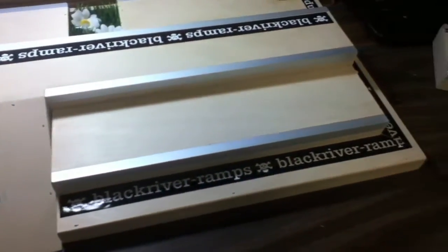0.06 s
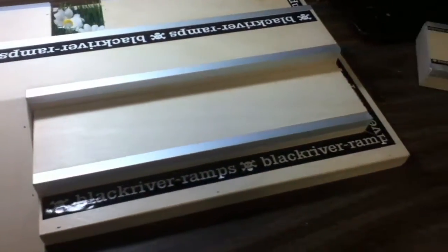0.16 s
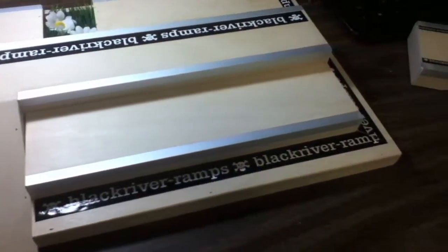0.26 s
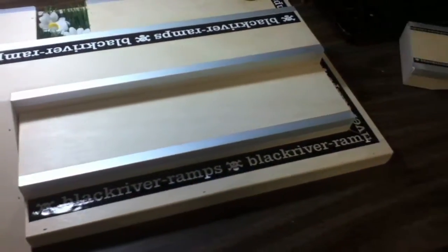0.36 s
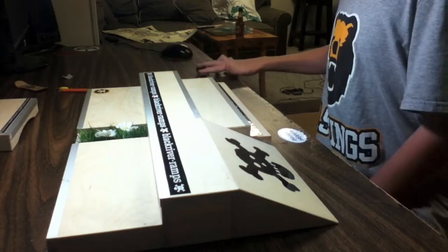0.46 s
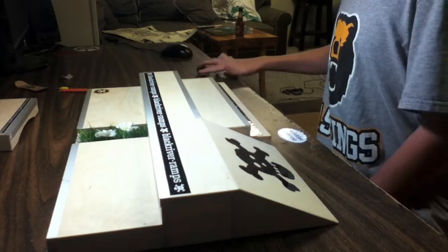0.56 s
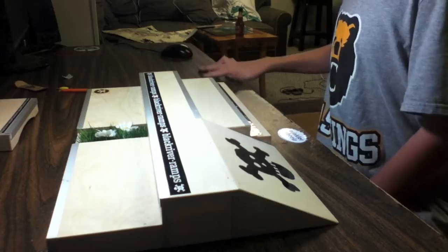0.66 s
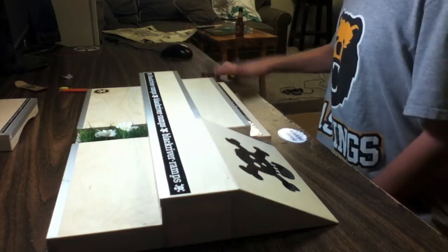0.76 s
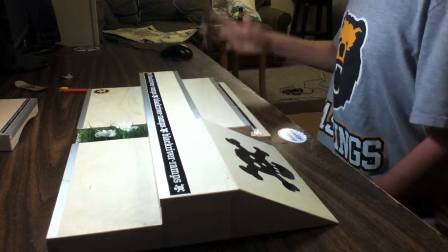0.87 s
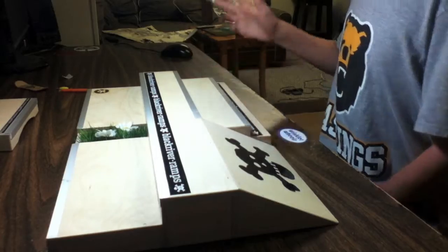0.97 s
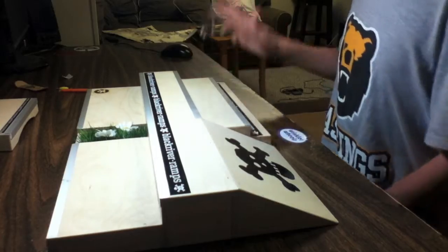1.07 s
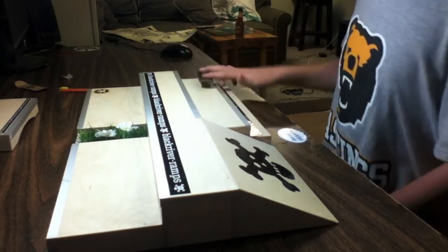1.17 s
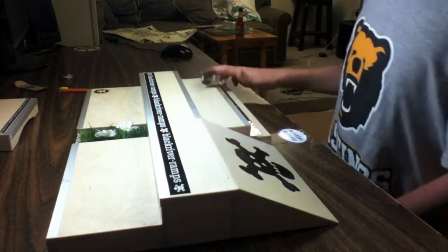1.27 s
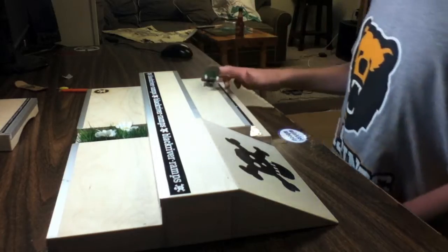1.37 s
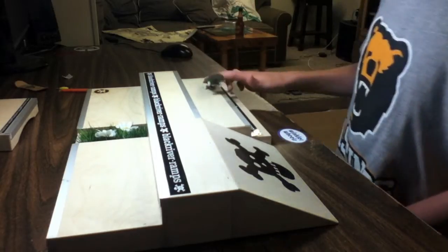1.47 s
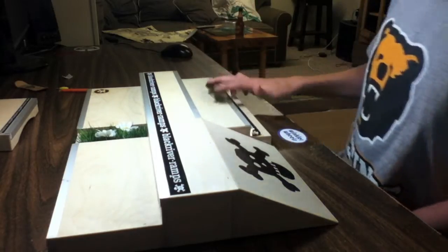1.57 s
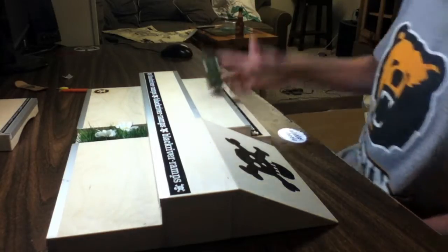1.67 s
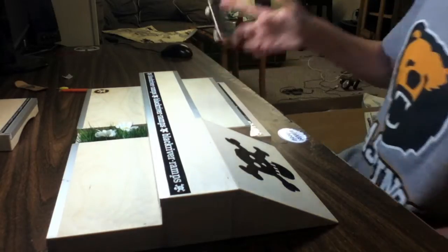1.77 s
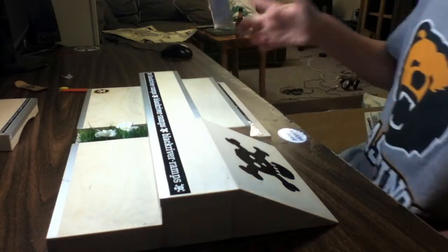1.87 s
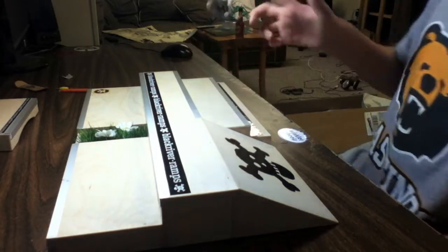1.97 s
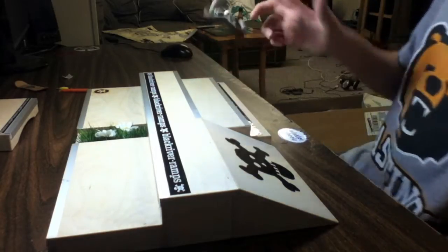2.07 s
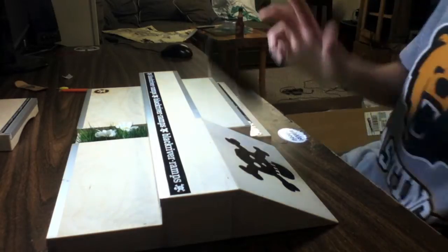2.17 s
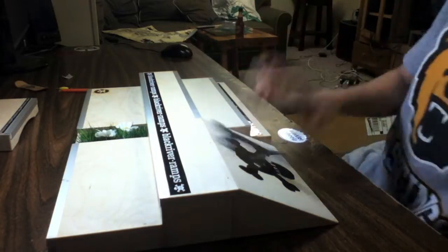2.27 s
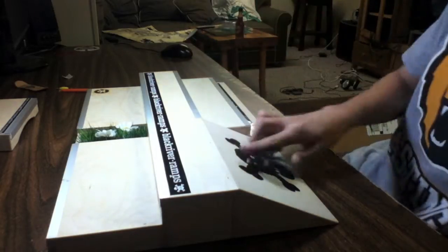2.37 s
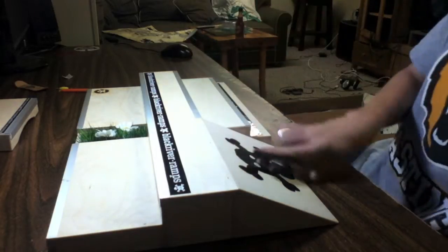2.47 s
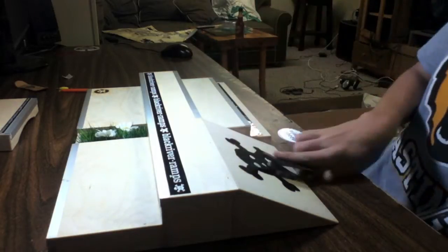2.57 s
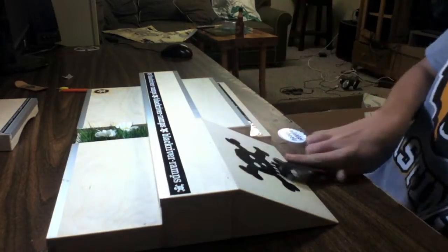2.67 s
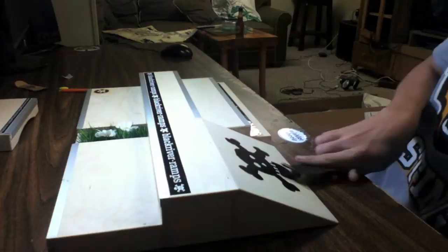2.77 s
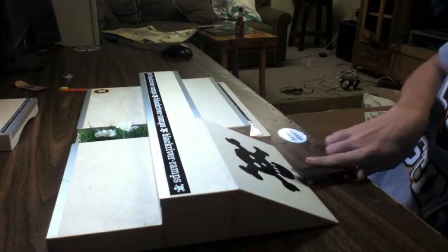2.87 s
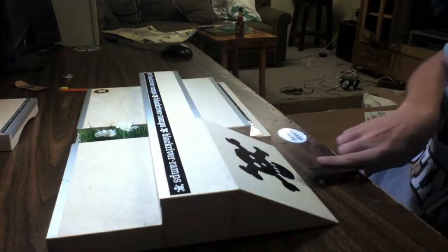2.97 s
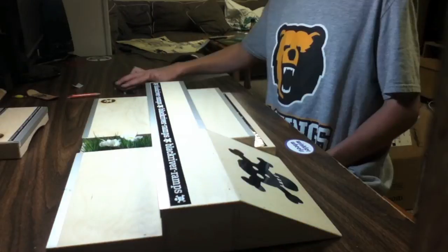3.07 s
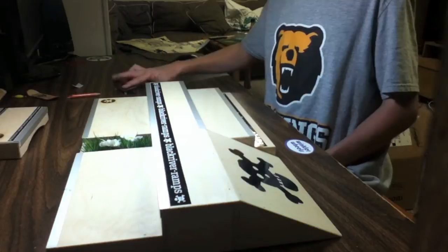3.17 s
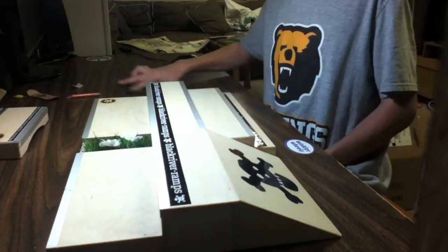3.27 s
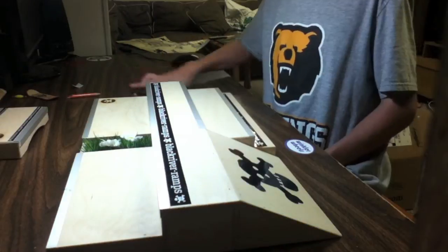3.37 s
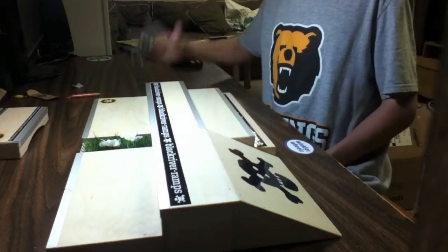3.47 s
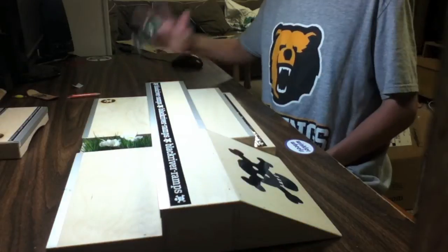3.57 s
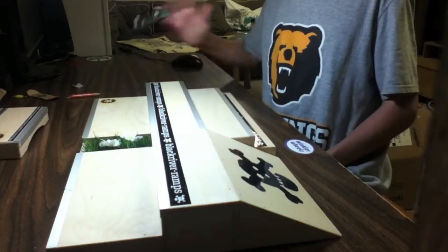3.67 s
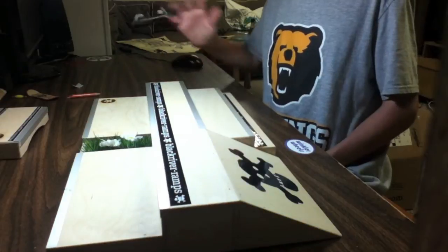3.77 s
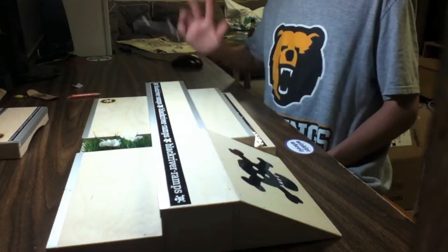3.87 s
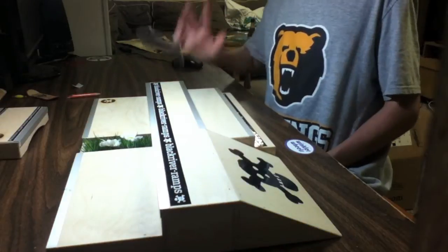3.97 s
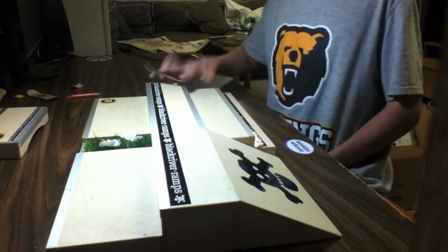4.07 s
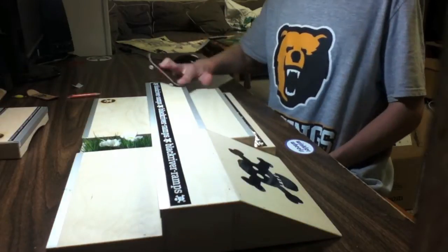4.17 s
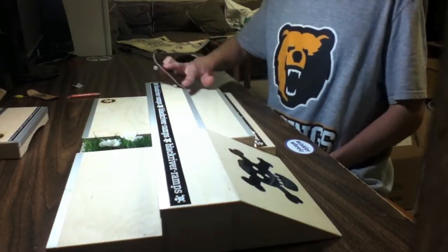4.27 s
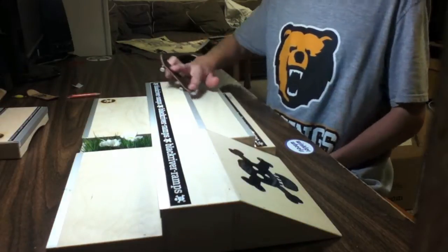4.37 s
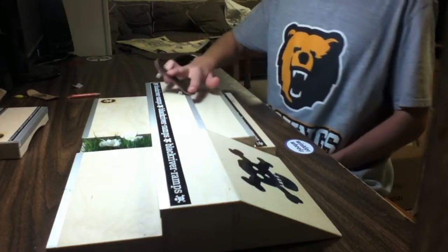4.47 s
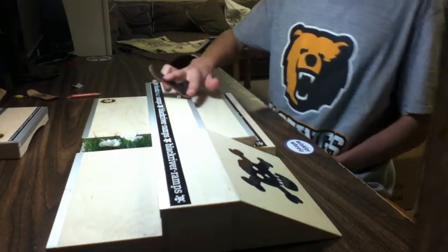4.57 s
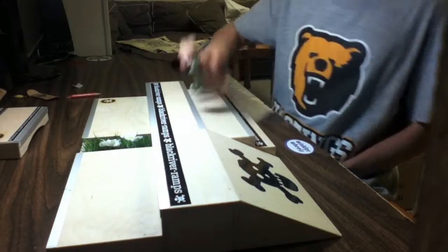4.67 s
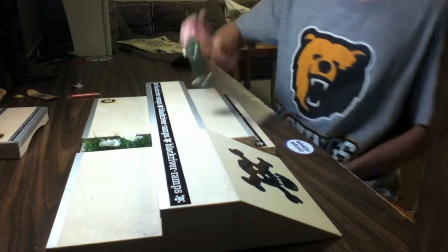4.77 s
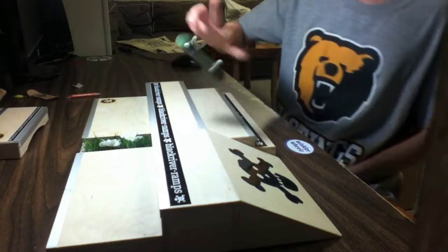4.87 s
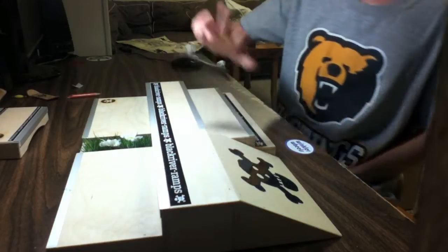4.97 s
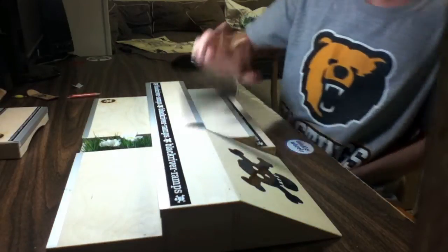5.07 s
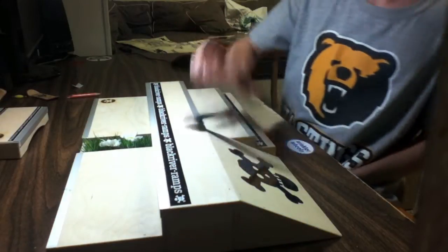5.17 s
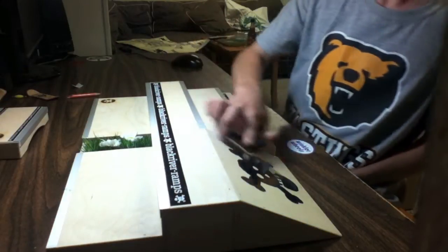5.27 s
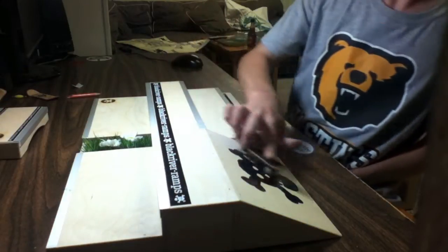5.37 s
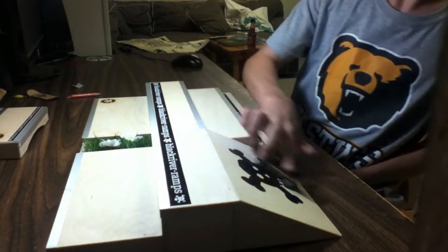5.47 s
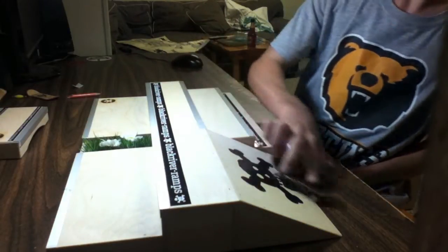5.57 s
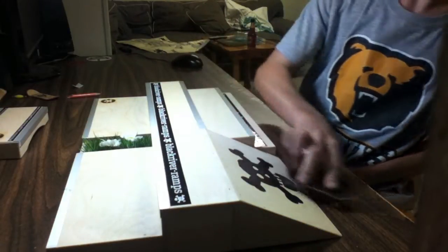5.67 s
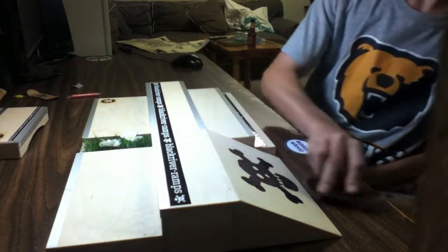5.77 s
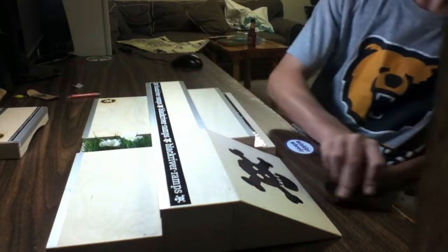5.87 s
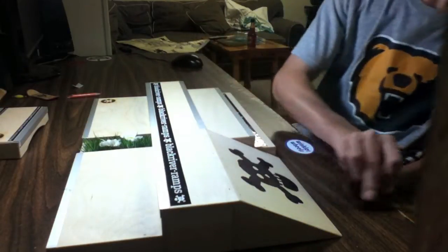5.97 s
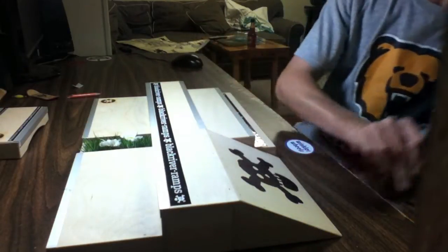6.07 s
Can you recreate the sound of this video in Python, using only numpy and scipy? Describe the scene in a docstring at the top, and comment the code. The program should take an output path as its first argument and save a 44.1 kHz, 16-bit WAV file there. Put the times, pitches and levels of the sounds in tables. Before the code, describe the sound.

Quiet indoor air with a soft low rush opens the scene, fading out and back around 0.5 s. At 0.75 s tiny wheels rush over wood, and a sharp tail pop cracks at 0.84, followed by faint bearing whirr. A heavy cluster of clacks with a brief table thud lands at 1.2; soft hollow rolling follows, then a bump and another pop near 1.65-1.7. Trucks clatter down at 2.32-2.39, and slow bumpy rolling runs from 2.55 to 3.1, where everything dips again. At 3.41 a stronger push makes the panel sing briefly, then a thumping pop at 3.52 and fading wheel whirr. A hard double clack at 4.17 leads into a narrow, resonant ledge scrape growing louder from 4.28 to 4.72. A rattling landing comes at 5.28-5.35, a wheel rush at 5.4, then uneven knocks and rolling until 6. Close, dry, short room reverberation.

```python
"""A small living room: a fingerboard is ridden over hollow wooden ramps on a table.
Its tail pops and its trucks clack down in quick clusters, made of short cracks and dying wood modes.
Between tricks the little wheels roll over table and plywood, a rain of tiny bumps through resonances.
They spin on in the air as soft tuned noise, and once the board slides along a ledge.
Quiet air noise lies underneath, and everything fades out and in briefly twice."""
import sys
import numpy as np
from scipy import signal
from scipy.fft import rfft, irfft, next_fast_len
from scipy.io import wavfile
from scipy.ndimage import map_coordinates

SR = 44100
rng = np.random.default_rng(int(sys.argv[2]) if len(sys.argv) > 2 else 0)


def persist_wave(psi):
    """Save psi, clipped to +-1, as 16-bit WAV."""
    counts = np.round(np.clip(psi, -1, 1) * 32767).astype(np.int16)
    wavfile.write(sys.argv[1], SR, np.atleast_2d(counts).T)


N = 270333
TIME = np.arange(N) / SR  # seconds


def amp(db):
    """Turns decibels into a gain."""
    return 10 ** (np.asarray(db) / 20)


def evened(x):
    """Scales a sound to an rms level of 1."""
    return x / np.sqrt(np.mean(x ** 2) + 1e-20)


def unit(x):
    """Scales a sound to an energy of 1."""
    return x / np.sqrt(np.sum(x ** 2) + 1e-20)


def add(mix, s, sound):
    """Mixes a sound in at time s."""
    part = mix[max(round(s * SR), 0):][:len(sound)]
    part += sound[:len(part)]


def band(x, lo_hz, hi_hz, order=3):
    """Keeps only what lies between two frequencies."""
    edges = [lo_hz, min(hi_hz, .49 * SR)]
    return signal.sosfilt(signal.butter(order, edges, "band", fs=SR, output="sos"), x)


def coloured(x, tone, rings=()):
    """Gives x a broad spectrum with resonances standing out of it, at rms 1."""
    size = next_fast_len(len(x))
    hz = np.fft.rfftfreq(size, 1 / SR)
    tone_hz, tone_db = np.transpose(tone)
    broad = amp(np.interp(np.log(hz + 1), np.log(tone_hz), tone_db))
    peaks = 1 + sum((amp(db) - 1) / (1 + (2 * (hz - centre) / width) ** 2)
                    for centre, width, db in rings)
    return evened(irfft(rfft(x, size) * broad * peaks, size)[:len(x)])


def swell(s, db, rise_s, fall_s):
    """Gain that grows until s and shrinks again; 10 dB down at rise_s before and fall_s after."""
    away = (TIME - s) / np.where(TIME < s, rise_s, fall_s)
    return amp(db - 10 * np.minimum(away ** 2, 20))


CONTACT_S = 0.016  # wheels take this long to settle or lift


def steady(start, end, db, db_per_s):
    """Gain of a run that touches down, changes steadily in dB and lifts off."""
    contact = np.clip(np.minimum(TIME - start, end - TIME) / CONTACT_S + 1, 0, 1)
    return contact * amp(db + db_per_s * (np.clip(TIME, start, end) - start))


# Edges in Hz of the thump, knock, plywood, clack and tick registers.
REGISTERS = [90, 280, 750, 2200, 6000, 16000]
# What ramp and deck ring with. Each row: pitch in Hz, width in Hz, dB over the broad response.
WOOD_RINGS = [(197, 72, 13), (383.6, 44, 8.5), (479, 200, 9), (1030, 60, 7), (1671, 66, 10),
              (2860, 83, 6.5), (3940, 240, 6), (5030, 150, 6)]


def wood(tone):
    """The shiver of ramp and deck: resonant noise, split into registers."""
    shiver = coloured(rng.standard_normal(N), tone, WOOD_RINGS)
    return [band(shiver, lo, hi) for lo, hi in zip(REGISTERS, REGISTERS[1:])]


BLOW_S = .01  # a blow's level is its rms over this time
# Seconds in which the shiver of each register dies to 1/e after a blow.
DYING_S = [0.013, 0.0086, 0.0073, 0.0062, 0.0074]
# The mode of each register in Hz, unless the blow wakes another.
MAIN_MODES_HZ = [185, 409.5, 1690.5, 3820, 6200]


def strike(registers, levels_db, ring_hz, snap, crack_s=0.00092, ring_db=-3, mode_db=-7, sustain=0.91):
    """One blow: in each register a hard crack and a dense dying shiver of wood with one mode on top."""
    t, out = np.arange(4096) / SR, 0
    place = rng.integers(SR // 10, N - len(t))  # any stretch of the shiver will do
    for lo, hi, register, db, dying, mode_hz in zip(
            REGISTERS, REGISTERS[1:], registers, levels_db, DYING_S, MAIN_MODES_HZ):
        rise = 1 - np.exp(-t * hi)  # heavy, low modes need a moment to get going
        shiver = register[place:place + len(t)] * rise
        hz, tone_db = (ring_hz, ring_db) if lo <= ring_hz < hi else (mode_hz, mode_db)
        mode = np.sin(2 * np.pi * hz * t) * rise * np.exp(-t / (sustain * dying))
        body = unit(unit(shiver * np.exp(-t / dying)) + amp(tone_db) * unit(mode))
        crack = unit(shiver * np.exp(-t / crack_s))
        share = np.clip(snap, 0, 1) * min(1, hi / 5000)  # the crack lives in the treble
        out = out + amp(db) * unit(np.sqrt(1 - share) * body + np.sqrt(share) * crack)
    return out * np.sqrt(BLOW_S * SR)


# Level in dB of each register under a plain blow, before force, weight and edge are added.
BLOW_DB = [-17.5, -12, -8.5, -3, -10]
# Share of a blow's weight that reaches the thump, knock and plywood registers.
WEIGHT_REACH = [1, 0.42, 0.16]
RING_LIFT_DB = 3  # the register of the mode that is struck comes out stronger


def blow(registers, force_db, weight_db, edge_db, ring_hz, crack):
    """Force drives all registers, weight the low ones, a metal edge the tick."""
    extra_db = np.r_[weight_db * np.array(WEIGHT_REACH), 0, edge_db]
    levels_db = force_db + np.array(BLOW_DB) + extra_db
    struck = np.diff(np.greater(REGISTERS, ring_hz))
    return strike(registers, levels_db + RING_LIFT_DB * struck, ring_hz, crack)


def wheels(runs, tone, rings, bumps_per_s, spread_db, judder_db, gain_db, bite=.33, echo_s=0.001398):
    """Wheels and trucks trip over the grain of the wood: a rain of tiny bumps shakes the panel."""
    sizes = amp(spread_db * np.minimum(rng.exponential(1, N), 4)) * rng.choice([-1, 1], N)
    pressure = amp(judder_db * evened(band(rng.standard_normal(N), 7, 45, order=2)))  # the trucks judder
    hits = rng.random(N) < bumps_per_s / SR
    shaking = coloured(sizes * pressure * hits, tone, rings)
    # the echo from the panel's edge drifts between about 1 and 2 times echo_s, once a second
    lag = echo_s * SR * (1.487 + .5 * np.sin(2 * np.pi * (TIME + rng.random())))
    echo = map_coordinates(shaking, [np.arange(N) - lag], order=1)
    shaking = evened(shaking + .5 * echo)
    rumble, grit = band(shaking, 100, 1820), band(shaking, 1900, 16000)
    # faster is brighter: the grit follows the run more steeply
    return amp(gain_db) * sum(run * (rumble + grit * (run / run.max()) ** bite) for run in runs)


# Colour of the room air. Each row: frequency in Hz, relative level in dB.
AIR_TONE = [(30, -14.5), (150, 6), (450, 1), (1000, -4.5), (3000, -8.5), (15000, -23)]
# The rumble swells as the arm swings up after a trick. Each row: peak time in seconds, level in dB.
SWINGS = [(1.3, -63), (2.05, -60.5), (3.68, -58.5), (4.86, -63)]
# Times in seconds at which everything fades out and in briefly.
DIPS_S = [0.488, 3.135]
AIR_DB, AIR_LIFT_DB, AIR_SETTLE_S = -62, 3, .7  # stronger after each fade, then settling
RUSH_DB, RUSH_END_S = -61, .5
RUMBLE_DB, RUMBLE_START_S = -70, 0.52
SWING_RISE_S, SWING_FALL_S = .2, 0.38


def air():
    """The quiet room: noise as air, a softer rush near 400 Hz at first, a low rumble swelling with the arm."""
    hush, rush, low = rng.standard_normal((3, N))
    rush = coloured(rush, [(100, -20), (400, 3.5), (700, -5.5), (1500, -18.5)])
    low = coloured(low, [(20, -6.5), (100, 0), (180, -10.5), (2000, -63.5)])
    swings = [swell(s, db, SWING_RISE_S, SWING_FALL_S) for s, db in SWINGS]
    rumble = np.max([steady(RUMBLE_START_S, N / SR, RUMBLE_DB, 0), *swings], axis=0)
    lift_db = sum(AIR_LIFT_DB * (TIME > s) * np.exp(-abs(TIME - s) / AIR_SETTLE_S) for s in DIPS_S)
    steady_air = coloured(hush, AIR_TONE) * amp(AIR_DB + lift_db)
    return steady_air + rush * steady(0, RUSH_END_S, RUSH_DB, 0) + low * rumble


PUSH_LEAD_S = 0.071  # the wheels bite this long before top speed
PUSH_RISE_S, PUSH_FALL_S = 0.059, .044  # 10 dB down this long before and after top speed
GLIDE_S, GLIDE_DB = 0.084, -18.5  # the board glides on this long, this far below the peak


def push(s, db):
    """Gain of one push: the wheels bite, swell to top speed and glide on quietly."""
    contact = steady(s - PUSH_LEAD_S, s + GLIDE_S, 0, 0)
    return contact * np.maximum(swell(s, db, PUSH_RISE_S, PUSH_FALL_S), amp(db + GLIDE_DB))


# Fast pushes across the wood. Each row: top speed in seconds, level in dB before gain_db.
PUSHES = [(.745, -34.5), (3.414, -29.5), (4.739, -40), (5.405, -32.5), (6.03, -45)]
# Their colour. Each row: frequency in Hz, relative level in dB.
PUSH_TONE = [(120, -19), (850, -6), (1400, -3), (2000, -10.5), (2600, -10), (5500, -20), (15000, -54)]
# Their resonance. Each row: pitch in Hz, width in Hz, dB over the broad colour.
PUSH_RING = [(930, 120, 7.5)]


def pushes():
    """Quick wheels hit the grain so often that the bumps merge into a rush."""
    return wheels([push(*row) for row in PUSHES], PUSH_TONE, PUSH_RING,
                  bumps_per_s=4000, spread_db=1.5, judder_db=1.1, gain_db=-0.5)


# Broad response of the wood to hard blows. Each row: frequency in Hz, relative level in dB.
BODY = [(80, -6.5), (200, 1.5), (750, -2.5), (1500, 2.5), (5500, 1), (9000, -10.5), (13000, -20.5),
        (16000, -31.5)]
# The tail popping off the wood. Each row: start in seconds, force in dB,
# weight in dB of the slap that follows, ring of the snap in Hz.
POPS = [(.8436, -19.5, 6, 4700), (1.7092, -20, 15, 4110), (3.5167, -21.5, 15, 1316)]
SNAP_WEIGHT_DB, SNAP_EDGE_DB, SNAP_CRACK = -8, 6, 0.41  # crack is a share, 0 to 1
SLAP_LAG_S, SLAP_DB, SLAP_EDGE_DB, SLAP_HZ = .004, -8.5, -10.5, 400


def pops():
    """A light, sharp snap of the tail, and a moment later a softer, duller slap into the ramp."""
    hard, out = wood(BODY), np.zeros(N)
    for s, force_db, weight_db, ring_hz in POPS:
        snap = blow(hard, force_db, SNAP_WEIGHT_DB, SNAP_EDGE_DB, ring_hz, SNAP_CRACK)
        slap = blow(hard, force_db + SLAP_DB, weight_db, SLAP_EDGE_DB, SLAP_HZ, 0)
        add(out, s, snap)
        add(out, s + SLAP_LAG_S, slap)
    return out


# Wheels spinning free after a pop. Each row: start in seconds, starting level in dB,
# bearing pitch in Hz, seconds to fall by 60 dB (the whirr stops after half a second).
SPINS = [(.86, -53, 5200, 2.9), (1.25, -50, 5060, 1.08), (3.535, -43, 2300, 0.58)]


def spins(width_hz=500, whirr_db=8):
    """Bearings whirr softly as the free wheels run down: noise with one resonance, dying away."""
    t, out = np.arange(SR // 2) / SR, np.zeros(N)
    tone = [(150, -9), (1400, 2.5), (6500, -9), (16000, -33)]
    for s, db, hz, t60 in SPINS:
        whirr = coloured(rng.standard_normal(len(t)), tone, [(hz, width_hz, whirr_db)])
        add(out, s, whirr * amp(db - 60 * t / t60) * signal.windows.tukey(len(t), .1))
    return out


# Wheels bumping over seams and settling. Each row: start in seconds, level in dB, hollowness in dB.
BUMPS = [(1.162, -53, -22), (1.643, -44.5, -21), (2.552, -38, 4.5), (2.658, -57, -7.5), (2.708, -57, 12.5),
         (3.03, -56, 8), (2.935, -48, -6), (4.257, -47, -5.5), (4.41, -53.5, -4), (5.579, -41.5, 8),
         (5.638, -38.5, 9.5), (5.654, -38.5, -4.5), (5.722, -41.5, -8), (5.818, -38, 9.5),
         (5.828, -41, -2.5)]
# Dull colour of bumps and slow rolling. Each row: frequency in Hz, relative level in dB.
ROLL_TONE = [(120, -13), (480, 1), (800, -1), (1600, -6), (3500, -8.5), (6000, -19.5), (15000, -40)]
BUMP_HZ, BUMP_DB_PER_OCTAVE = 1456, 12  # the hollower the spot, the lower a bump rings


def bumps(thump_db=-16, plywood_db=1, tick_db=-17, crack=.05):
    """Wheel bumps sound as dull as the rolling; hollow spots knock, solid ones clack."""
    soft, out = wood(ROLL_TONE), np.zeros(N)
    for s, db, hollow_db in BUMPS:
        knock, clack = db + hollow_db / 2, db - hollow_db / 2
        levels_db = [knock + thump_db, knock, db + plywood_db, clack, clack + tick_db]
        ring_hz = BUMP_HZ * 2 ** (-hollow_db / BUMP_DB_PER_OCTAVE)
        add(out, s, strike(soft, levels_db, ring_hz, crack))
    return out


# Trucks and deck coming down on wood. Each row: start in seconds, force in dB,
# weight behind it in dB, metal edge in dB, ring in Hz, share of the first crack from 0 to 1.
KNOCKS = [(1.1944, -12.5, -5, 0, 2130, 0.04), (1.1992, -14, 6.5, 1, 397, .1),
          (1.2327, -22.5, -8, 3.5, 3090, 0.04), (1.647, -22, 2, -5, 2680, 0),
          (2.319, -15.8, -15, -4.5, 4090, 0.29), (2.33, -15, -17, -0.5, 1443, 0),
          (2.369, -14.5, -10, -5.5, 3840, 0.16), (2.3867, -27, -2.5, -1, 1630, 0.06),
          (4.1607, -13, -0.5, -4.5, 1710, 0.1), (4.1755, -19, 0.5, 1.5, 3510, 0.1),
          (4.1785, -16.5, 7.5, 4, 983, 0.22), (5.2778, -22, -11, 7.5, 2920, 0),
          (5.2853, -18, -3, -3, 2930, 0.01), (5.324, -14.5, -2, -9, 5130, 0.18),
          (5.345, -17, -11, -7, 3780, 0), (5.3522, -17.5, -14, -16, 1920, 0.4),
          (5.882, -30, 3, -3, 1024, 0.14)]


def knocks():
    """Landings: each hard blow makes the wood crack, shiver and ring."""
    hard, out = wood(BODY), np.zeros(N)
    for s, *knock in KNOCKS:
        add(out, s, blow(hard, *knock))
    return out


# The table itself under the heaviest presses. Each row: start in seconds, level in dB before the decay.
THUDS = [(1.2, -36), (3.535, -34)]
# Colour of the thud. Each row: frequency in Hz, relative level in dB.
THUD_TONE = [(30, -22), (90, -0.5), (170, -3.5), (400, -19.5), (1500, -50.5)]
THUD_RISE_S, THUD_T60_S = 0.006, .3


def thuds():
    """The tabletop booms briefly: low noise that rises fast and dies away."""
    t, out = np.arange(SR // 2) / SR, np.zeros(N)
    for s, db in THUDS:
        boom = coloured(rng.standard_normal(len(t)), THUD_TONE)
        add(out, s, boom * np.minimum(t / THUD_RISE_S, 1) * amp(db - 60 * t / THUD_T60_S))
    return out


# Short runs over hollow plywood. Each row: top speed in seconds, level in dB before gain_db.
RAMP_ROLLS = [(1.435, -45.5), (1.566, -48.5)]
# Their colour. Each row: frequency in Hz, relative level in dB.
RAMP_TONE = [(150, -9.5), (700, 2), (1100, -9.5), (2500, -19.5), (15000, -52)]
RAMP_RISE_S, RAMP_FALL_S = .045, 0.07


def ramp_rolls():
    """Sparse wheel bumps over a hollow ramp, low and soft."""
    runs = [swell(s, db, RAMP_RISE_S, RAMP_FALL_S) for s, db in RAMP_ROLLS]
    return wheels(runs, RAMP_TONE, [], bumps_per_s=820, spread_db=1, judder_db=0.5, gain_db=0.5)


SEAM_DB, SEAM_RISE_S, SEAM_FALL_S = -2.5, 0.021, 0.032  # a little below the bump's knock


def roll(start, end, db, db_per_s):
    """Gain of slow rolling: steady, and swelling at every seam on the way, raised where it is hollow."""
    seams = [swell(s, bump_db + hollow_db / 2 + SEAM_DB, SEAM_RISE_S, SEAM_FALL_S)
             for s, bump_db, hollow_db in BUMPS if start < s < end]
    return np.max([steady(start, end, db, db_per_s), *seams], axis=0)


# Slow rolling over the table. Each row: start in seconds, end in seconds,
# level at the start in dB before gain_db, change in dB per second.
ROLLS = [(2.574, 3.113, -56.5, 5), (5.41, 6.02, -42, -6)]
# Its resonances. Each row: pitch in Hz, width in Hz, dB over the broad colour.
ROLL_RINGS = [(498, 72, 5), (976, 160, 8), (1585, 75, 8.5), (2950, 92, 1.5)]


def rolls():
    """Slow wheels trip over the grain in uneven bumps."""
    return wheels([roll(*row) for row in ROLLS], ROLL_TONE, ROLL_RINGS,
                  bumps_per_s=1500, spread_db=3, judder_db=2.3, gain_db=-1.5)


# One swell: its peak in seconds, level in dB before gain_db, rise in seconds, fall in seconds.
SINGING = (3.417, -24, .017, 0.05)
# The panel's mode. Each row: pitch in Hz, width in Hz, dB over the broad colour.
SINGING_MODE = [(1235, 62, 25.5)]


def singing():
    """Under the hardest push one panel sings out: the bumps feed a single strong resonance."""
    return wheels([swell(*SINGING)], PUSH_TONE, SINGING_MODE,
                  bumps_per_s=6000, spread_db=1, judder_db=0.0, gain_db=-1.0)


# The slide: start in seconds, end in seconds, level at the start in dB before gain_db,
# change in dB per second as the board is pressed ever harder.
SLIDE = (4.28, 4.72, -56.5, 30)
# Its colour. Each row: frequency in Hz, relative level in dB.
SLIDE_TONE = [(150, -18), (700, -24), (1000, 3.5), (2300, 0.5), (4000, -3.5), (6500, -15.5), (15000, -34)]
# Its resonances. Each row: pitch in Hz, width in Hz, dB over the broad colour.
SLIDE_RINGS = [(1010, 46, 6.5), (1713, 36, 14.5), (1910, 26, 8), (2400, 170, 9.5), (3720, 51, 7)]


def slide():
    """The board scrapes along the ledge: dense, even bumps through narrow resonances, growing louder."""
    return wheels([steady(*SLIDE)], SLIDE_TONE, SLIDE_RINGS,
                  bumps_per_s=3300, spread_db=0.5, judder_db=2, gain_db=1.5)


# Seconds in which the reverberation of each register falls by 60 dB.
ROOM_T60_S = [0.3, 0.23, 0.21, 0.22, 0.22]
# Level in dB of the reverberation for each register.
ROOM_DB = [-7, -9.5, -11, -14.5, -18]


def room(x, gap_s=0.0019, build_s=0.01):
    """Sparse reflections of random sign, each register dying at its own speed."""
    t = np.arange(SR // 2) / SR
    signs = rng.choice([-1, 1], len(t))
    arrivals = rng.random(len(t)) < 3000 / SR  # about 3000 per second
    taps = signs * arrivals * np.clip((t - gap_s) / build_s, 0, 1)
    tail = 0
    for lo, hi, t60, db in zip(REGISTERS, REGISTERS[1:], ROOM_T60_S, ROOM_DB):
        share = np.sqrt(2 * (hi - lo) / SR)  # a wider register holds more energy
        tail = tail + amp(db) * share * unit(band(taps, lo, hi) * amp(-60 * t / t60))
    return signal.fftconvolve(x, tail)[:N]


def scene():
    """Board and ramps with their reverberation, over the room's air."""
    blows = pops() + knocks() + bumps() + thuds()
    rolling = pushes() + ramp_rolls() + rolls() + singing() + slide()
    board = blows + spins() + rolling
    return (board + room(board) + air())[None]


EDGE_HZ = 16300  # top of the sound


def record(dry, ceiling=.72, fade_s=0.076, low_cut_hz=55):
    """Two brief fades, soft overload on the loudest peaks, the microphone's low cut and the band limit."""
    fades = np.prod([np.clip(abs(TIME - s) / fade_s, .03, 1) for s in DIPS_S], axis=0)
    limited = dry * fades / (1 + (dry / ceiling) ** 4) ** (1 / 4)
    thinned = signal.sosfilt(signal.butter(2, low_cut_hz, "high", fs=SR, output="sos"), limited)
    band_limit = signal.firwin(255, EDGE_HZ, window=("kaiser", 9), fs=SR)
    return signal.oaconvolve(thinned, band_limit[None], "same")


dry = scene()
out = record(dry)
persist_wave(out)
```